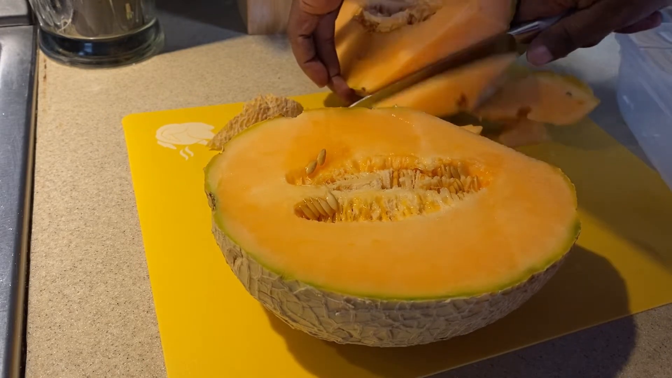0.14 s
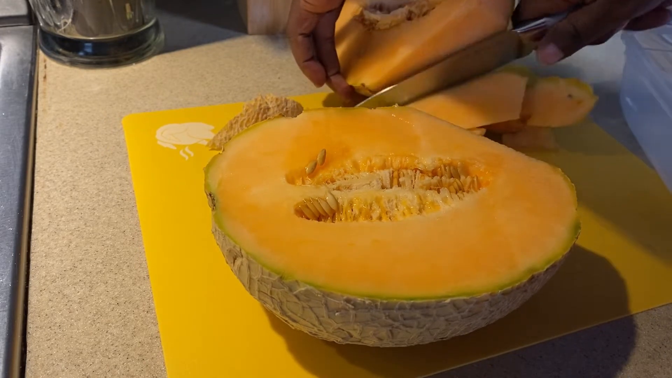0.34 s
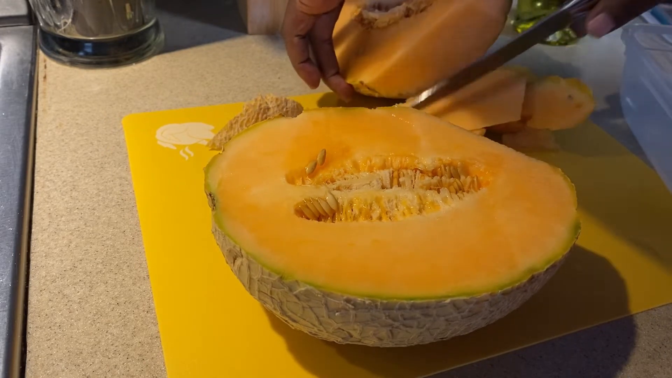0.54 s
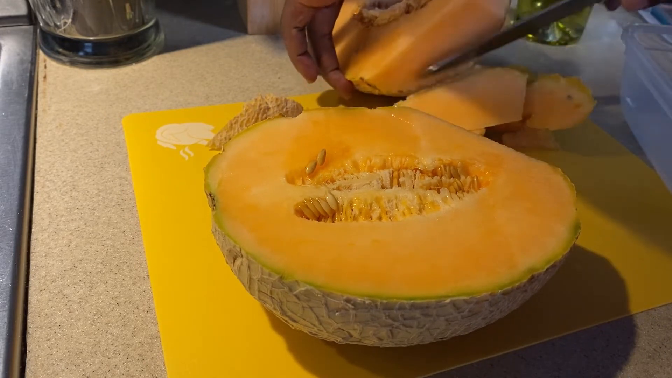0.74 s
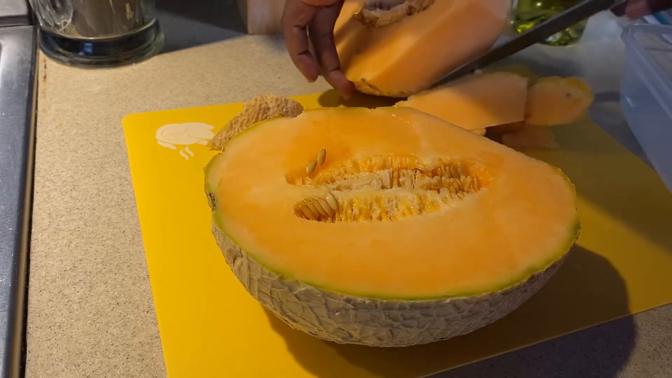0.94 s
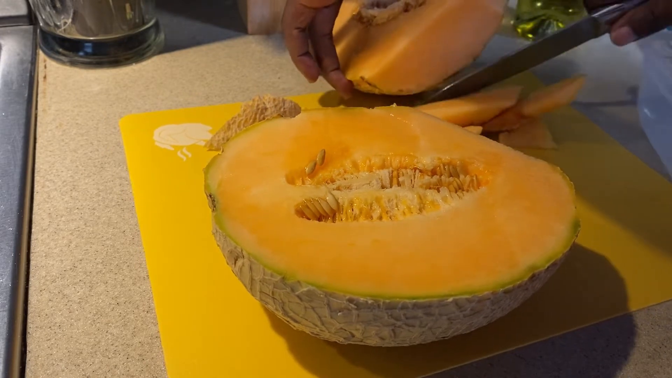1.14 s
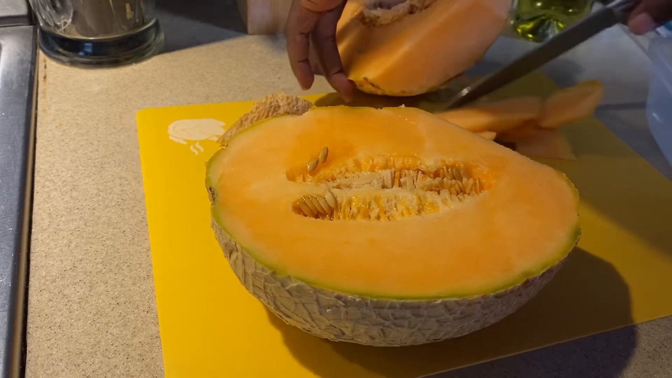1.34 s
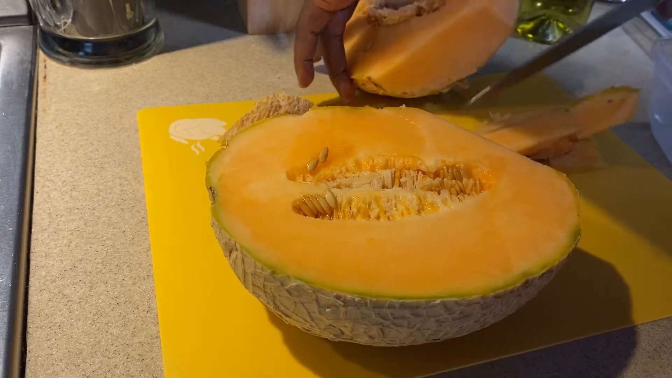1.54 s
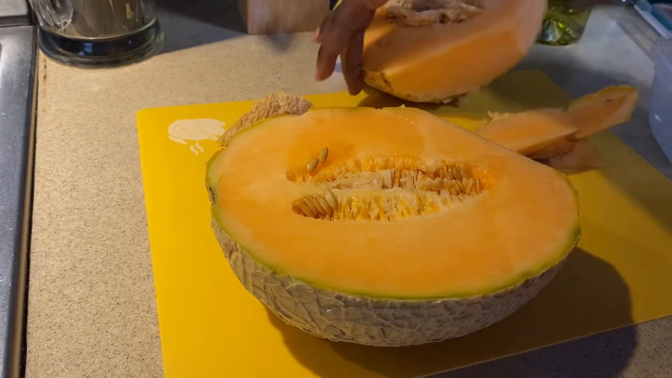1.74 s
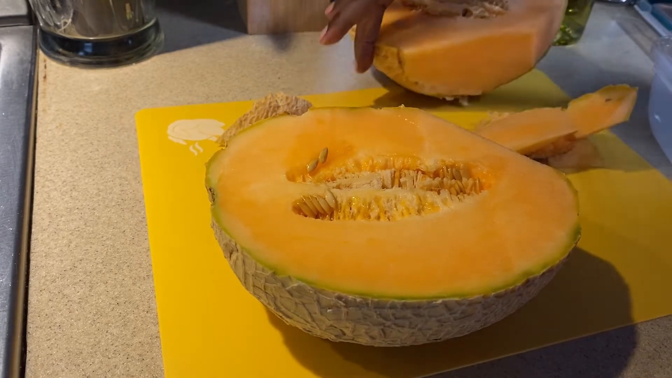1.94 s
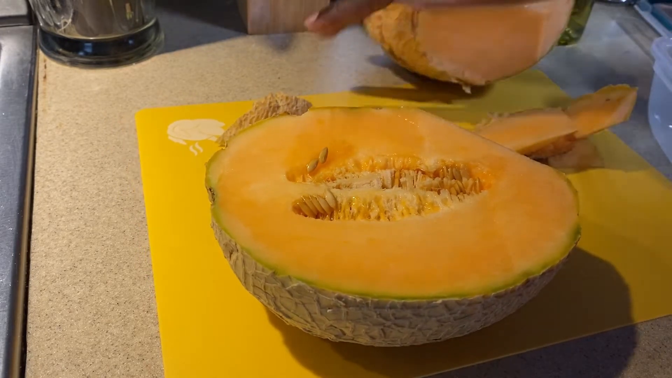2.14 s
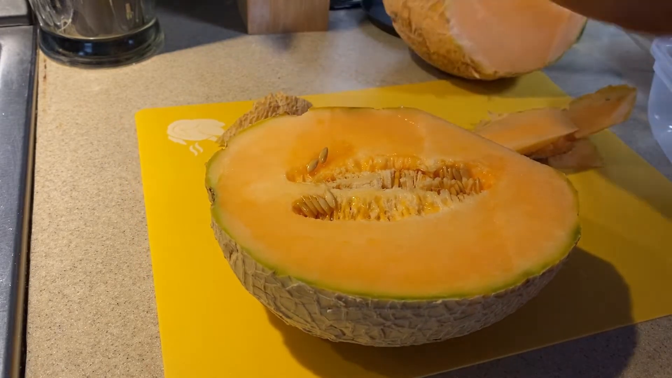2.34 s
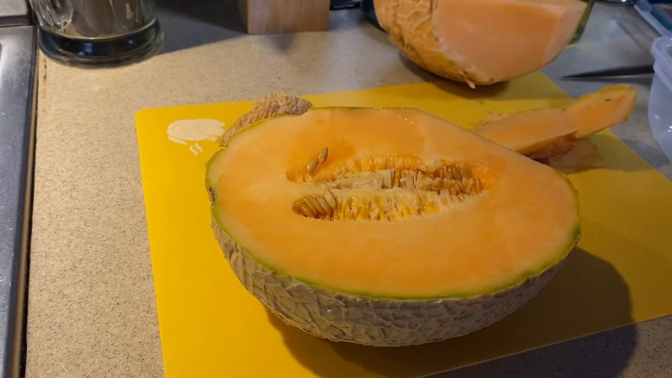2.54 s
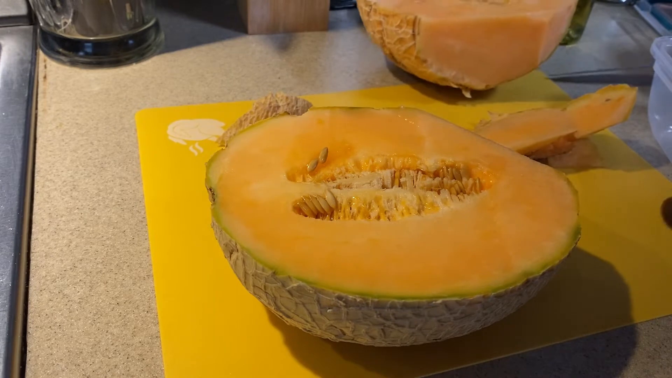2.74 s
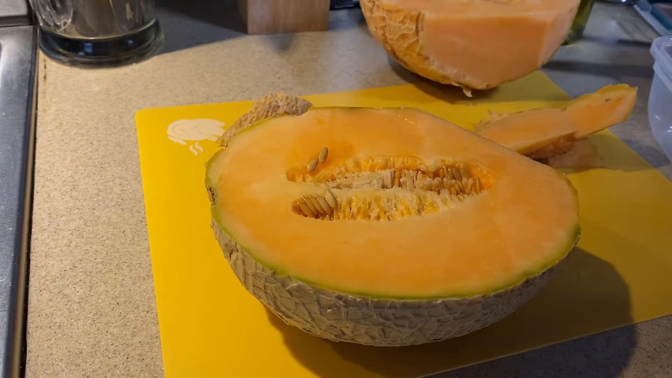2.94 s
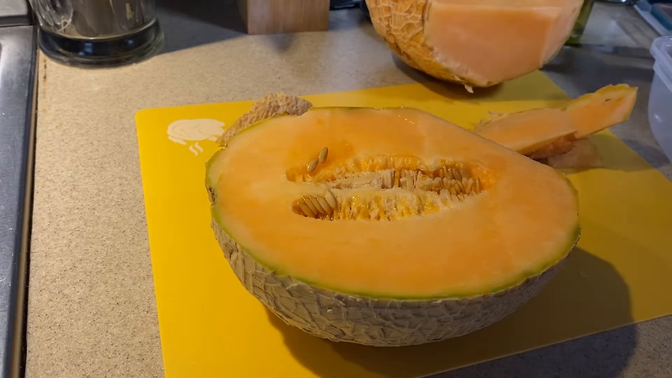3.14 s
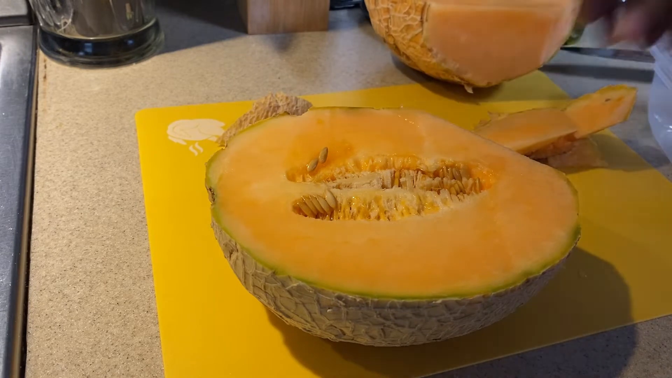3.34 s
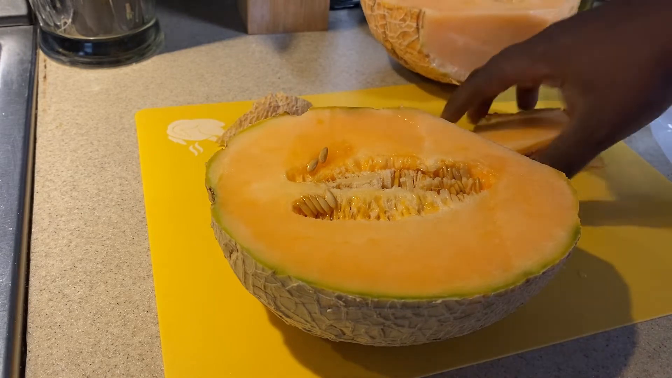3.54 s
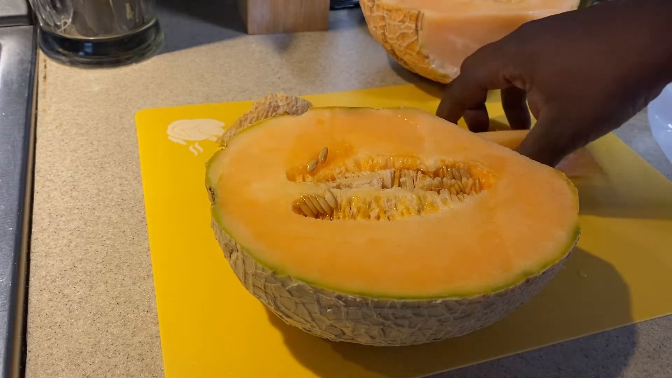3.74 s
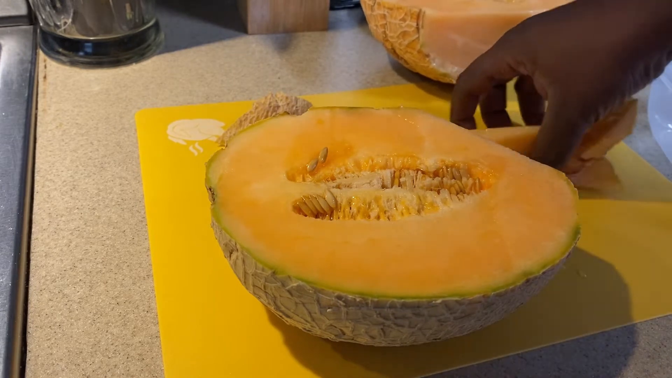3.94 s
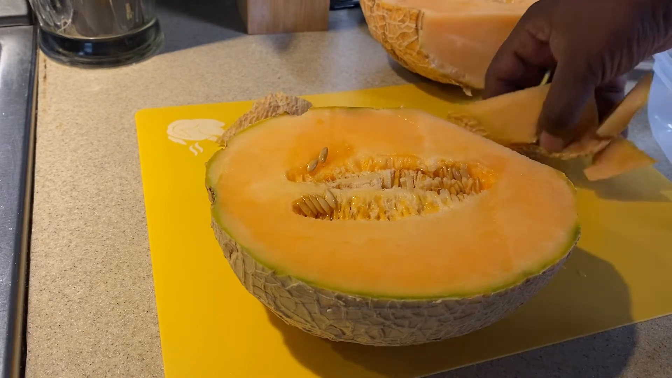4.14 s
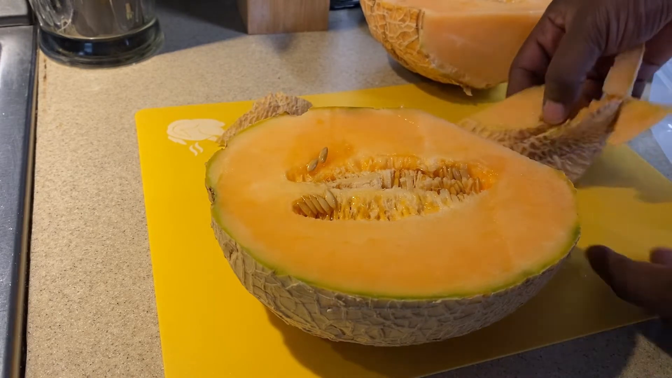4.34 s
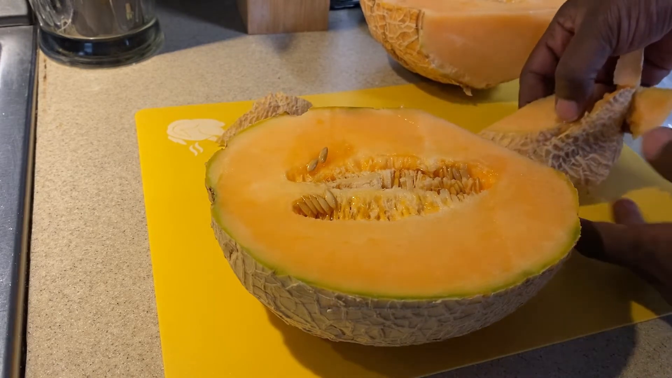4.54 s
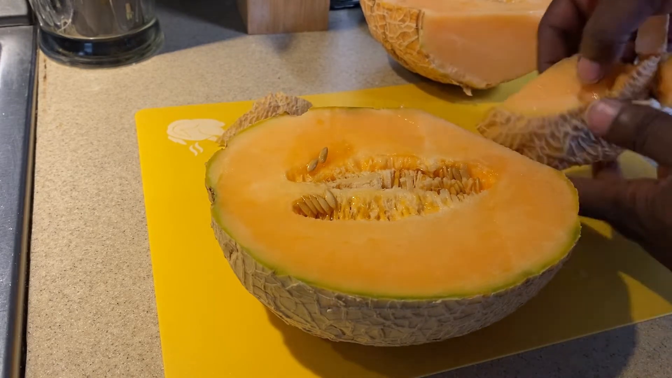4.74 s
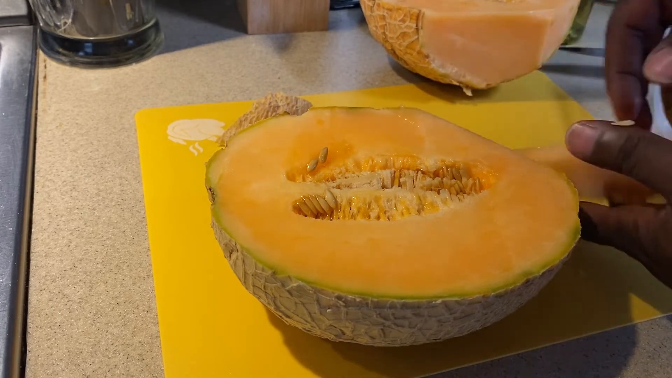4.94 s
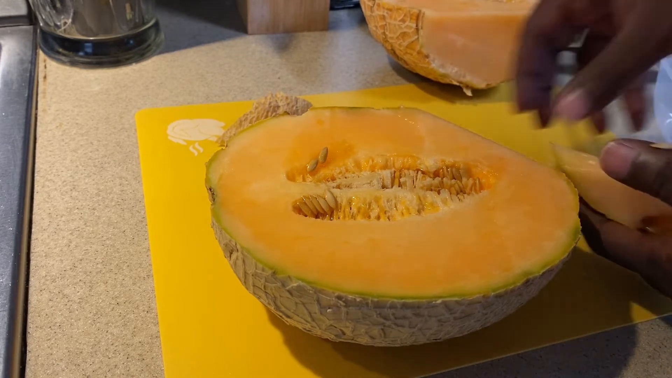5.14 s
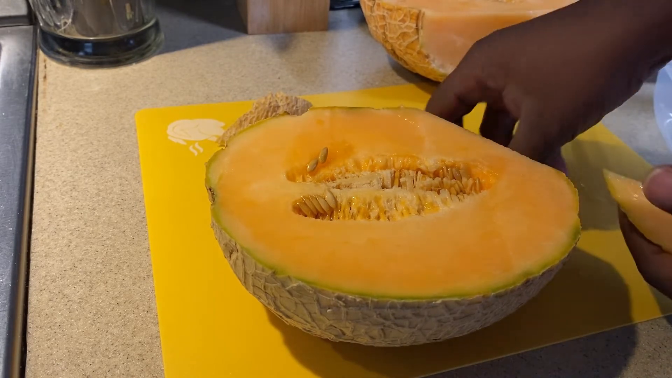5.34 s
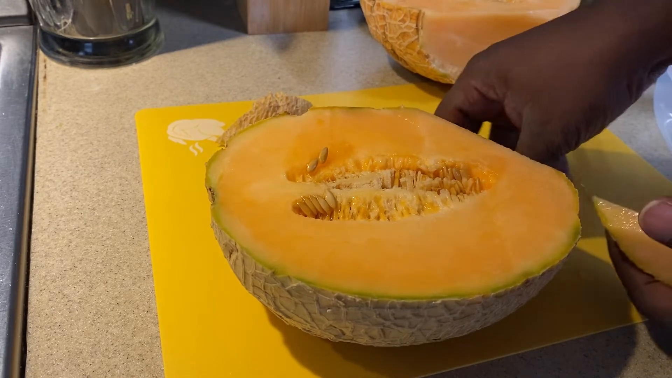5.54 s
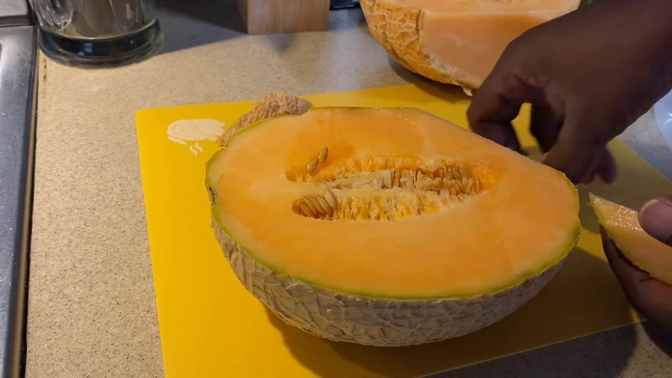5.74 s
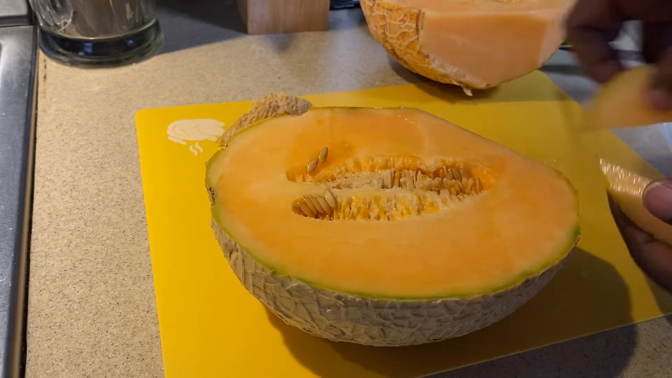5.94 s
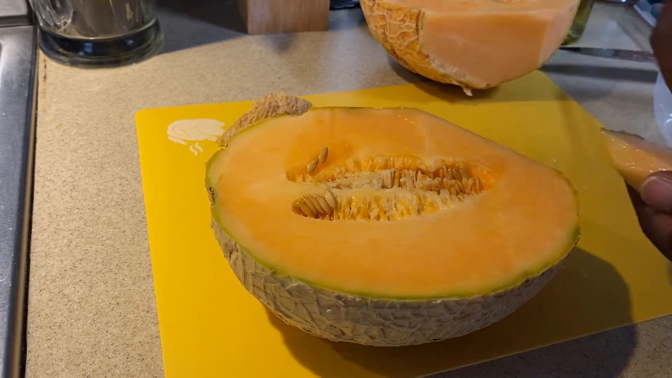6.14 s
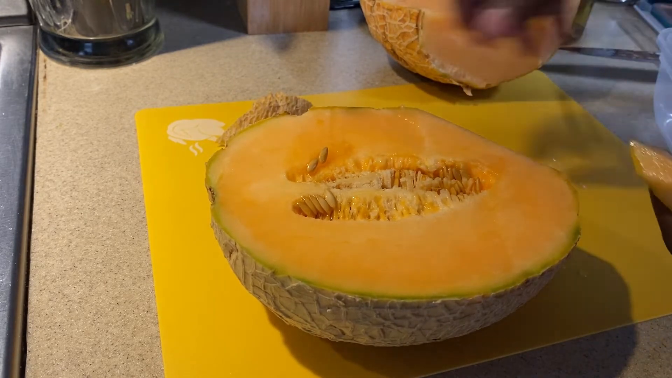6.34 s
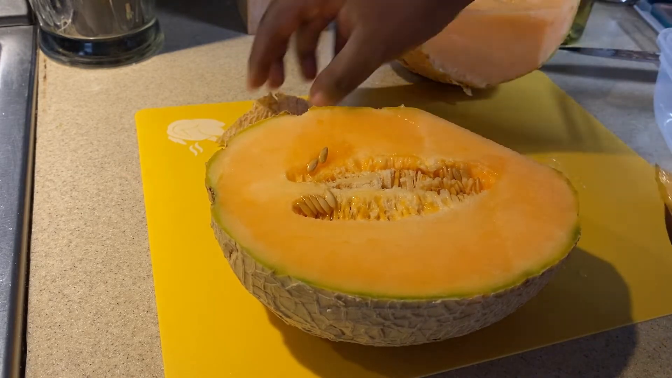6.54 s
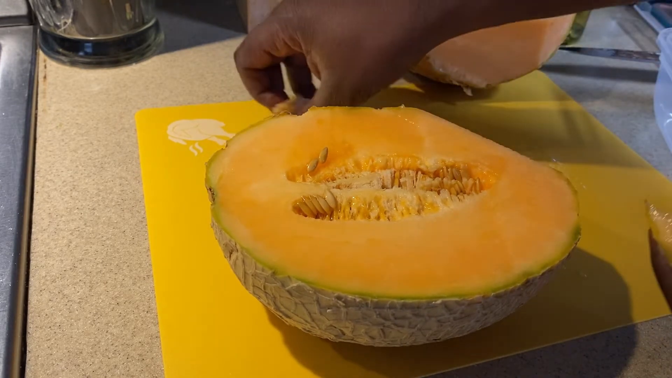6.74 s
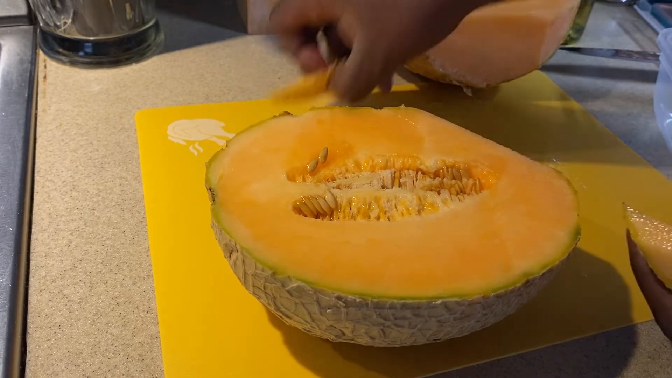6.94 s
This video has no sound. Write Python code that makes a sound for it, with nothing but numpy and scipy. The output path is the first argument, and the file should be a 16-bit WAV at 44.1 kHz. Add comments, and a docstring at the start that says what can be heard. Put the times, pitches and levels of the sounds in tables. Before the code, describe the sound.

In a quiet kitchen, a knife slices the rind off a melon with a dull, juicy rub and knocks through onto a plastic cutting board, loudest about a second in. The knife is then put down: its steel blade rings briefly and the handle rattles to rest. Afterwards fingers gather the wet peel with faint smacks, soft thuds and small squelches. The sound is close, with a little room reverberation.

```python
"""A kitchen knife slices the rind off a melon and knocks through onto a plastic cutting board.
Each impact excites the damped modes of board and counter; friction and juice give bands of noise.
The knife is put down: its steel blade rings in free vibration, then the handle rattles to rest.
Fingers gather the wet peel with small smacks, thuds and squelches. The quiet kitchen reverberates."""
import sys
import numpy as np
from scipy import signal
from scipy.fft import rfft, irfft, next_fast_len
from scipy.io import wavfile
from scipy.ndimage import uniform_filter1d, map_coordinates

SR = 44100
rng = np.random.default_rng(int(sys.argv[2]) if len(sys.argv) > 2 else 0)


def dump(signal):
    """Clip the signal to [-1, 1] and save it as 16-bit WAV at the path in sys.argv[1]."""
    limited = np.clip(np.atleast_2d(signal).T, -1, 1)
    pcm = np.round(limited * 32767).astype(np.int16)
    wavfile.write(sys.argv[1], SR, pcm)


N = 308697

# spectrum of dull rubbing and shuddering on the board: f/Hz, density level/dB
RUB_SPECTRUM = [(40, -38), (90, -4), (300, -1), (650, -10), (900, -10), (1250, -12), (2000, -15.5),
                (3500, -27), (7000, -56.5)]
SIDES = np.array([[1], [-1]])  # opposite signs for left and right
KNOCK_PAN_DB = -2  # left minus right, as for every pan


def amp(db):
    """Amplitude ratio of a level in decibels."""
    return 10 ** (np.asarray(db) / 20)


def unit(x):
    """Normalisation to an rms of 1."""
    return x / np.sqrt(np.mean(x ** 2) + 1e-20)


def peaked(x):
    """Normalisation to a peak of 1."""
    return x / (np.abs(x).max() + 1e-20)


def along(points, hz):
    """Interpolation of (f/Hz, value) points on a logarithmic frequency axis."""
    f, v = np.transpose(points)
    return np.interp(np.log(hz + 1), np.log(f + 1), v)


def octaves(hz, centre_hz):
    """Interval in octaves from a centre frequency."""
    return np.abs(np.log2((hz + 1) / centre_hz))


def seconds(size):
    """Time axis of size samples."""
    return np.arange(size) / SR


def add(track, s, sound, pan_db=0):
    """Superposition of a sound on a stereo track at time s."""
    start = max(round(s * SR), 0)
    part = (sound * amp(SIDES * pan_db / 2))[:, :N - start]
    track[:, start:start + part.shape[1]] += part


def noise(colour_db, size, grain_db=0):
    """Partly coherent stereo noise of rms 1; random amplitude modulation (grain_db) makes it crackle."""
    # likeness of left and right: f/Hz, coherence
    coherence = [(100, 0.91), (300, 0.98), (700, 0.54), (3000, 0.51), (9000, 0.18)]
    m = next_fast_len(size)
    hz = np.fft.rfftfreq(m, 1 / SR)
    grains = amp(grain_db * unit(uniform_filter1d(rng.standard_normal(m), size=24)))
    angle = np.arccos(np.clip(along(coherence, hz), -1, 1)) / 2
    shape = amp(colour_db(hz)) * np.array([np.cos(angle), np.sin(angle)])
    mid, side = irfft(rfft(grains * rng.standard_normal((2, m))) * shape, m)[:, :size]
    return unit(np.array([mid + side, mid - side]))


def ring(modes, size, scatter_db, width):
    """Modal superposition: damped sinusoids of alternating sign, with a side signal near quadrature."""
    t, out = seconds(size), np.zeros((2, size))
    for k, (hz, db, t60) in enumerate(modes):
        decay = (-1) ** k * amp(db + scatter_db * rng.standard_normal() - 60 * t / t60)
        mid = decay * np.sin(2 * np.pi * hz * t)
        side = width * decay * np.cos(2 * np.pi * hz * t + 0.13 * rng.standard_normal())
        out += [mid + side, mid - side]
    return out


def pressure(events, release_db_per_s=220):
    """Envelope of (t/s, duration/s, level/dB) gestures that rise, hold and fade; their powers add."""
    t, power = seconds(N), np.zeros(N)
    for start, length, db in events:
        onset_s = 0.023 + 0.44 * length  # long strokes start gently
        rise_db = 20 * np.maximum(start - t, 0) / onset_s
        fall_db = release_db_per_s * np.maximum(t - start - length, 0)
        heard = rise_db + fall_db < 60
        power[heard] += amp(db - rise_db[heard] - fall_db[heard]) ** 2
    return np.sqrt(power)


def wobble(knots_per_s):
    """Smooth random modulation: a spline through Gaussian values."""
    knots = rng.standard_normal(int(N * knots_per_s / SR) + 4)
    return map_coordinates(knots, [np.arange(N) * knots_per_s / SR])


def patchy(x, depth_db):
    """Brief resonances of juice and air pockets, as random gains over frequency and time."""
    spectra = signal.stft(x, nperseg=512)[2]
    field = uniform_filter1d(rng.standard_normal(spectra.shape[1:]), size=7, axis=0)
    field = unit(uniform_filter1d(field, size=5, axis=1))
    return unit(signal.istft(spectra * amp(depth_db * field), nperseg=512)[1][:, :N])


def strokes():
    """Stick-slip friction modulates a dull rub and the fizz of juice as blade and fingers slide."""
    # strokes on the fruit: t/s, duration/s, rub level/dB, hiss level/dB
    gestures = [(0, 0.0099, -60.5, -69.5), (0.094, 0.083, -57, -61.5), (1.063, 0.14, -47, -63),
                (1.076, 0.019, -36, -53.5), (1.23, 0.22, -58, -55), (1.346, 0.054, -51.5, -52.5),
                (1.699, 0.033, -64, -67.5), (2.315, 0.25, -60.5, -68.5), (3.622, 0.081, -54, -57),
                (3.76, 0.17, -64, -62.5), (3.94, 0.38, -67, -65.5), (4.169, 0.058, -62.5, -61),
                (4.345, 0.18, -67.5, -55), (4.575, 0.022, -51.5, -56), (4.851, 0.069, -60.5, -71.5),
                (5.022, 0.42, -96.5, -73), (6.618, 0.16, -66, -63.5), (6.947, 0.042, -62, -65.5)]
    # spectrum of fizzing juice: f/Hz, density level/dB
    juice = [(400, -22.5), (1000, -15.5), (2300, -1.5), (4800, -0.5), (7500, -6.5), (11500, -10.5),
             (16000, -18.5)]
    start, length, rub_db, wet_db = np.transpose(gestures)
    rub = patchy(noise(lambda hz: along(RUB_SPECTRUM, hz), N, grain_db=2.0), depth_db=2.5)
    wet = patchy(noise(lambda hz: along(juice, hz), N, grain_db=3.5), depth_db=1.8)
    rub *= pressure(zip(start, length, rub_db)) * amp(-.6 * SIDES)
    wet *= pressure(zip(start, length, wet_db)) * amp(.7 * SIDES)
    stick_slip = amp(1.3 * wobble(knots_per_s=45))
    return stick_slip * (rub + wet)


def pats():
    """A soft impact excites only low, heavily damped modes: fruit and hand thud."""
    # soft bumps: t/s, peak level/dB, f/Hz
    bumps = [(.002, -46, 148), (0.093, -38, 176), (0.175, -29.5, 170.5), (1.088, -23, 205),
             (1.152, -24, 190), (1.712, -56, 176), (2.33, -41.5, 71), (3.077, -29, 142.7),
             (3.554, -40.5, 91.3), (4.662, -51, 175), (6.588, -45, 199)]
    out, t = np.zeros((2, N)), seconds(SR // 2)
    for s, db, hz in bumps:
        thud = ring([(hz, 0, .11), (1.8 * hz, -9, .07)], len(t), scatter_db=1, width=.1)
        add(out, s, amp(db) * peaked(thud * (1 - np.exp(-t / 0.0049))), pan_db=-1.5)
    return out


def smacks():
    """Sudden release of tension: fibres snap and wet peel lets go in crackling noise bursts."""
    # snaps and smacks: t/s, peak level/dB, spectral peak f/Hz, T60/s
    snaps = [(.086, -42.5, 11900, .02), (.112, -31, 10100, 0.0093), (0.136, -32, 4020, 0.014),
             (.151, -49, 13000, 0.019), (0.204, -44, 4660, 0.022), (1.697, -34.5, 4660, 0.019),
             (3.552, -32.5, 4600, 0.027), (3.613, -46, 2510, 0.032), (3.655, -31, 4440, 0.13),
             (4.318, -40, 6940, 0.03), (4.84, -47, 6330, 0.027), (6.585, -28, 4480, 0.026),
             (6.628, -32.5, 4560, 0.037), (6.986, -36, 1390, 0.052)]
    out, t = np.zeros((2, N)), seconds(SR // 5)
    for s, db, bright_hz, t60 in snaps:
        burst = noise(lambda hz: -13 * np.sqrt(octaves(hz, bright_hz)), len(t), grain_db=1.5)
        envelope = (1 - np.exp(-t / (0.045 * t60))) * amp(-60 * t / t60)
        add(out, s, amp(db) * peaked(burst * envelope), pan_db=1.5)
    return out


def knock(pitch_hz, settle_s, focus_db, clatter_db):
    """Selective excitation: the struck spot favours modes near one pitch; the load detunes them."""
    # modes of the board: f/Hz, level/dB, T60/s
    board_modes = [(290, 0, 0.16), (355, 3, 0.11), (417, 1.5, 0.059), (547, 2, 0.14), (619.8, 2.5, 0.15),
                   (652, 0, .05), (805, -3.5, 0.22), (890, -15.5, 0.016), (1107, 0.5, 0.17),
                   (1240, -1.5, 0.057), (1310, -1, 0.037), (1290, -7.5, 0.028), (1490, -7.5, 0.26),
                   (2450, -15, 0.027)]
    # stereo width of the board's radiation: f/Hz, side-to-mid ratio
    width = [(100, .07), (290, 0.39), (600, 1), (1400, 1)]
    # spectrum of the clatter: f/Hz, density level/dB
    colour = [(90, -24.0), (200, -6.5), (700, -0.5), (1400, -7.5), (2200, -16.5), (5000, -42.5)]
    t, modes = seconds(SR // 3), []
    for hz, db, t60 in board_modes:
        detuned_hz = hz * (1 + .007 * rng.standard_normal())
        modes.append((detuned_hz, db - focus_db * np.tanh(octaves(hz, pitch_hz) / .6), t60))
    body = ring(modes, len(t), scatter_db=1, width=along(width, pitch_hz))
    # the patch under the blade sinks in pitch as the load spreads
    strike_hz, patch_db, patch_t60 = 1600, 6, .042 + 4 * settle_s
    sinking_hz = pitch_hz + (strike_hz - pitch_hz) * np.exp(-t / settle_s)
    phase = 2 * np.pi * np.cumsum(sinking_hz) / SR
    patch = np.sin(phase) + SIDES * along(width, sinking_hz) * np.cos(phase)
    patch *= amp(patch_db - 60 * t / patch_t60)
    tone = peaked((body - patch) * (1 - np.exp(-t / .0009)))
    clatter = noise(lambda hz: along(colour, hz), len(t))
    return tone + clatter * amp(clatter_db - 60 * t / .06) * (1 - np.exp(-t / .0015))


def thump():
    """The counter's large mass gives it low natural frequencies and a slow response."""
    # modes of the counter: f/Hz, level/dB, T60/s
    modes = [(79, -10, 0.21), (99, -14, 0.39), (125, -6.5, 0.2), (188, 1, 0.046), (212, -2, 0.061)]
    t = seconds(SR // 3)
    return peaked(ring(modes, len(t), scatter_db=2.0, width=0.069) * (1 - np.exp(-t / 0.0032)))


def blows():
    """Impact excitation: a contact crack, the board's knock, the counter's thump and a dull shudder."""
    # blows on the board: t/s, level/dB, crack offset/dB, favoured f/Hz, pitch settling time/s
    impacts = [(.093, -33.5, -17, 714, 0.0013), (0.136, -37.5, -21, 327, 0.0021),
               (0.157, -23, -23, 539, 0.0063), (.259, -29.5, -21.5, 460, 0.0031),
               (0.317, -39.5, -19, 310, .003), (0.754, -58.5, -10.5, 960, 0.0022),
               (0.99, -32, -13.5, 552.8, 0.0026), (1.079, -8.5, -12.5, 288, 0.0017),
               (1.116, -20, -36, 290, 0.00081), (1.1455, -5.5, -7.5, 669, .001),
               (1.146, -10, -30, 1369, 0.0022), (1.18, -25, -24, 1290, 0.0012),
               (2.398, -42.5, -23, 534, 0.0021), (2.511, -16, 0.5, 1150, 0.0022),
               (2.54, -22, -0.5, 1220, 0.0012), (2.615, -34, -22, 430, 0.0015),
               (2.826, -50, -10.5, 403, 0.0017), (2.963, -17, -13, 402.7, 0.0017),
               (3.015, -22.5, -12, 382, 0.00172), (3.039, -17.5, -6.5, 424, 0.0022),
               (3.134, -19.5, -12.5, 394, 0.0021), (3.212, -22, -14.5, 357, 0.00186),
               (3.784, -45.5, -22, 870, 0.0026), (4.567, -52, -26, 350, 0.0023),
               (4.607, -45, -29, 350, 0.0023), (4.852, -34.5, -38, 590, .002), (4.905, -43, -9, 805, 0.003),
               (6.587, -46, 5, 661, 0.0011), (6.637, -43.5, 4.5, 617, 0.0011)]
    # spectrum of hard contact: f/Hz, density level/dB
    contact = [(300, -18.5), (1200, -2), (2500, 2.5), (4000, -1), (7000, -4.5), (11000, -10.5),
               (16000, -13.5)]
    out, t = np.zeros((2, N)), seconds(SR // 2)
    shudder_envelope = (1 - np.exp(-t / 0.006)) * amp(-28.5 - 60 * t / 0.49)
    for s, db, crack_db, pitch_hz, settle_s in impacts:
        snap = noise(lambda hz: along(contact, hz), len(t))
        dull_tail = noise(lambda hz: along(contact, hz) - 6 * hz / 10000, len(t))
        crack = snap * amp(-60 * t / 0.011) + dull_tail * amp(-12.5 - 60 * t / 0.079)
        add(out, s, amp(db + crack_db + 6.0) * crack * (1 - np.exp(-t / 0.001)))
        board = knock(pitch_hz, settle_s, focus_db=13.0, clatter_db=-7.5)
        add(out, s + 0.00042, amp(db) * board, KNOCK_PAN_DB)
        add(out, s, amp(-30.5 + 0.52 * db) * thump())  # grows more slowly than the blow
        shudder = noise(lambda hz: along(RUB_SPECTRUM, hz) - 8 * np.tanh(octaves(hz, pitch_hz) / 0.25),
                        len(t), grain_db=0.5)
        add(out, s, amp(db) * shudder_envelope * shudder)
    return out


def drag():
    """Sliding friction of wet melon on plastic gives a soft, hollow swish."""
    # slides: t/s, duration/s, level/dB
    slides = [(.325, 0.0062, -60), (2.21, 0.15, -61.5)]
    # spectrum of the swish: f/Hz, density level/dB
    colour = [(500, -11), (1500, -11.5), (2350, 3.5), (3200, -9.5), (7000, -12.5), (16000, -31)]
    return pressure(slides) * noise(lambda hz: along(colour, hz), N, grain_db=1.0)


def steel(t, tilt_db):
    """Free vibration of the blade: its modes decay in two stages, many beat, and one swells late."""
    # modes of the blade: f/Hz, level/dB, T60/s, beat f/Hz, beat depth (negative swells first), pan/dB
    modes = [(1098, -36.5, .85, 6, .15, -2), (1276, -44, 1, 0, 0, 0), (2188, -37.5, .76, 0, 0, 5),
             (2740, -30, .32, 5.5, -.55, 6), (3349, -30, .33, 5.5, .4, -1), (3941, -51, .33, 0, 0, 0),
             (4258, -37, .28, 0, 0, 0), (4324, -45, .4, 0, 0, 0), (4631, -44, .5, 11, .7, 2),
             (4904, -35, .28, 0, 0, 0), (6036, -33.5, .31, 10, .55, -3), (6288, -48, .3, 0, 0, 0),
             (7615, -49, .27, 0, 0, 0), (7856, -35.5, .23, 19, .3, 0), (9789, -37, .28, 11.5, .8, 0),
             (10040, -44, .27, 0, 0, 0), (10792, -47, .28, 0, 0, 0), (11090, -51, .28, 0, 0, 0),
             (11572, -50, .27, 0, 0, 0), (11905, -43, .23, 17, .4, 0), (14321, -42, .22, 25, .3, 0)]
    swell_hz, swell_db, swell_peak_s = 4631, -41.5, .092
    out = np.zeros((2, len(t)))
    for hz, db, t60, beat_hz, depth, pan_db in modes:
        octave = np.log2(hz / 2200)
        flash = amp(-6.5 + 5.6 * octave - 60 * t / 0.11)
        beating = 1 + depth * np.cos(2 * np.pi * beat_hz * t)
        envelope = amp(db) * (flash + amp(-60 * t / t60)) * beating
        if hz == swell_hz:
            envelope += amp(swell_db) * (t / swell_peak_s * np.exp(1 - t / swell_peak_s)) ** 9
        phase = rng.uniform(0, 2 * np.pi) + SIDES * (0.68 + 0.058 * octave)
        out += amp(tilt_db * octave + SIDES * pan_db / 2) * envelope * np.sin(2 * np.pi * hz * t + phase)
    return out


def clinks():
    """Contact damping: the blade rings freely after each touch until a resting contact stills it."""
    # touches: t/s, level/dB, tilt/(dB per octave), rise time/s, free ringing time/s
    touches = [(0.437, -29.5, -3.5, 0.012, 0.04), (0.748, -45.5, 3, 0.0035, 0.0077),
               (2.512, -1, 0, 0.00024, 0.456)]
    stilled_t60 = .17
    out, t = np.zeros((2, N)), seconds(SR * 2 // 3)
    for s, db, tilt_db, rise_s, free_s in touches:
        damping = amp(-60 * np.maximum(t - free_s, 0) / stilled_t60)
        add(out, s, amp(db) * steel(t, tilt_db) * damping * (1 - np.exp(-t / rise_s)))
    return out


def scrape():
    """Friction of the edge grazing the rind gives a thin, bright rasp that stops quickly."""
    # grazes: t/s, duration/s, level/dB
    grazes = [(.445, .04, -63), (.75, .035, -69.5), (.94, .06, -63.5), (1.06, .02, -49.5), (1.82, .08, -75)]
    # spectrum of the rasp: f/Hz, density level/dB
    colour = [(800, -11), (1200, -4.5), (2000, -10.5), (4300, -2), (7000, -2.5), (11000, -0.5), (16000, 0)]
    rasp = noise(lambda hz: along(colour, hz), N, grain_db=4.5)
    return pressure(grazes, release_db_per_s=331.5) * rasp


def taps():
    """Brief contact gives a broad spectrum: the settling steel ticks on the board and rings thinly."""
    # taps of steel: t/s, tick level/dB, ring level/dB
    contacts = [(2.965, -39, -69), (2.97, -40, -71), (3.015, -44, -67), (3.042, -37, -49.5),
                (3.053, -26, -49), (3.135, -45, -70), (3.144, -26, -62), (3.155, -36, -77),
                (3.211, -28, -58), (3.219, -40, -64)]
    # high modes left to the blade as it lies on the board: f/Hz, level/dB, T60/s
    modes = [(7273, -9, .14), (7607, -14, .2), (8215, -7, .14), (11000, -11, .1), (11580, -5, .11),
             (11910, 0, .14), (12210, -6, .12), (14150, -5, .2)]
    # spectrum of a tick: f/Hz, density level/dB
    colour = [(1000, 23), (4000, 6), (11000, -9.5), (16000, -1.5)]
    out, t = np.zeros((2, N)), seconds(SR // 4)
    for s, tick_db, ring_db in contacts:
        tick = noise(lambda hz: along(colour, hz), len(t))
        add(out, s, amp(tick_db - 60 * t / .009) * tick)
        add(out, s, amp(ring_db) * ring(modes, len(t), scatter_db=5, width=1.0))
    return out


def rattle():
    """Repeated impacts: the knife rocks to rest, and each contact ticks and excites board and counter."""
    # uneven contacts of the handle: t/s, relative level/dB
    contacts = [(3.053, 5.5), (3.061, -7), (3.079, -2), (3.094, 1), (3.104, -3.5), (3.142, -1),
                (3.155, 1.5), (3.165, -0.5), (3.178, -1.5), (3.191, -2), (3.202, -11), (3.218, 3.5),
                (3.231, -1.5)]
    # spectrum of a tick: f/Hz, density level/dB
    colour = [(300, -26.5), (900, 5.0), (2200, 8.0), (3700, 3.0), (6000, -10.0), (16000, -39.0)]
    out, t = np.zeros((2, N)), seconds(SR // 16)
    for s, db in contacts:
        tick = noise(lambda hz: along(colour, hz), len(t))
        add(out, s, amp(db - 34 - 60 * t / 0.054) * tick)
        board = knock(pitch_hz=396, settle_s=.001, focus_db=17.0, clatter_db=-4.0)
        add(out, s, amp(db - 28) * board, KNOCK_PAN_DB)
        add(out, s, amp(db - 34.5) * thump())
    return out


def sweeps():
    """Light friction between hand and peel gives a faint, broad band of noise."""
    # brushing movements: t/s, duration/s, level/dB, spectral peak f/Hz
    brushes = [(3.772, 0.015, -54, 1010), (3.88, .04, -61, 1200), (4.2, 0.041, -56.5, 1612),
               (6.215, 0.079, -77.5, 5790), (6.351, 0.066, -71.5, 2724)]
    out = np.zeros((2, N))
    for s, length, db, bright_hz in brushes:
        swish = noise(lambda hz: -11 * octaves(hz, bright_hz) ** 0.84, N)
        out += pressure([(s, length, db)]) * swish
    return out


def bursts(pitch_hz, size):
    """Cavity resonance: tiny bursts of juice ring near a pitch that rises as their pocket shrinks."""
    bursts_per_s, decay_cycles, scatter_db, scatter_octaves, glide_per_s = 800, 7, 4, .045, .9
    count, t = int(bursts_per_s * size / SR), seconds(SR // 100)
    out = np.zeros((2, size + len(t)))
    starts = rng.uniform(0, size, count).astype(int)
    phases = rng.uniform(-1.26, 1, count)
    detunings, strengths = rng.standard_normal((2, count))
    for start, phase, detuning, strength in zip(starts, phases, detunings, strengths):
        hz = pitch_hz * 2 ** (scatter_octaves * detuning) * (1 + glide_per_s * start / SR)
        decay = amp(scatter_db * np.tanh(strength)) * np.exp(-hz * t / decay_cycles)
        out[:, start:start + len(t)] += decay * np.sin(2 * np.pi * hz * t + SIDES * phase)
    return unit(out[:, :size])


def squelch():
    """Forced flow: juice pinched out of the peel hisses and excites two pocket resonances."""
    # pinches: t/s, duration/s, level/dB, lower f/Hz, upper f/Hz, upper relative level/dB
    pinches = [(5.3067, 0.0063, -38.5, 3260, 4140, -1.5), (5.317, 0.032, -49.5, 3025, 3900, -2),
               (5.35, 0.023, -50, 3200, 5500, -2), (5.387, 0.038, -53, 4050, 6610, -8),
               (5.469, 0.071, -59, 3300, 4190, -4), (5.503, 0.028, -53.5, 3240, 4070, -5.5),
               (5.528, 0.028, -53.5, 3620, 5400, 1), (5.568, 0.041, -57.5, 2760, 4700, -6)]
    # spectrum of the hiss: f/Hz, density level/dB
    colour = [(300, -6), (1000, -13), (1700, -4.5), (2300, -6), (3000, -2.5), (4400, -9), (5300, -11),
              (7000, -10.5), (9000, -19), (16000, -15)]
    out, t = np.zeros((2, N)), seconds(SR // 10)
    for s, length, db, lower_hz, upper_hz, upper_db in pinches:
        hiss = amp(-2) * noise(lambda hz: along(colour, hz), len(t), grain_db=2)
        wet = unit(hiss + bursts(lower_hz, len(t)) + amp(upper_db) * bursts(upper_hz, len(t)))
        attack = np.minimum(t / (.002 + .2 * length), 1)
        fall_db = 20 * np.maximum(t - length, 0) / (.003 + .6 * length)
        add(out, s, amp(db - fall_db) * attack * wet, pan_db=2.0)
    return out


def kitchen(x):
    """Reverberation: reflections from cupboards and walls decay at a rate that depends on frequency."""
    # reverberation time: f/Hz, T60/s
    decay_times = [(100, 0.46), (300, 0.3), (1000, .4), (4000, .42), (12000, 0.35)]
    hz, t, spectra = signal.stft(rng.standard_normal((2, SR * 2 // 3)), SR, nperseg=256)
    decay = amp(-60 * t / along(decay_times, hz)[:, None])
    tail = signal.istft(spectra * decay, SR, nperseg=256)[1]
    # long waves reach both sides more alike
    lowpass = signal.butter(2, 300, fs=SR, output="sos")
    tail[1] += signal.sosfilt(lowpass, tail[0] - tail[1])
    tail *= 1 - np.exp(-seconds(tail.shape[1]) / .012)  # builds up as the sound reaches the walls
    return signal.fftconvolve(x.mean(axis=0)[None], tail / np.linalg.norm(tail[0]), axes=1)[:, :N]


def scene():
    """Superposition of direct sound, reverberation and a low, steady background."""
    # spectrum of the kitchen's background: f/Hz, density level/dB
    room_tone = [(24, -33.5), (48, -2), (85, -13), (130, -16), (290, -24), (500, -34), (1200, -44),
                 (2500, -43.5), (4000, -50), (16000, -52)]
    direct = blows() + pats() + rattle() + taps() + smacks() + strokes()
    direct += drag() + scrape() + squelch() + sweeps() + clinks()
    background = amp(-65.5) * noise(lambda hz: along(room_tone, hz), N)
    return direct + amp(-9.5) * kitchen(direct) + background


def record(dry):
    """Linear filtering: each microphone port colours its side, and a band limit cuts the top treble."""
    # difference between the ports: f/Hz, left minus right level/dB
    port_balance = [(120, 0.5), (480, -1.5), (680, -3), (1100, 0.5), (1500, 0), (2200, 2.5), (5000, 0)]
    top_hz, edge_hz = 16200, 700
    m = next_fast_len(N + SR // 4)
    hz = np.fft.rfftfreq(m, 1 / SR)
    ports = amp(SIDES * along(port_balance, hz) / 2)
    band_limit = np.clip((top_hz - hz) / edge_hz + .5, 0, 1)
    return irfft(rfft(dry, m) * ports * band_limit, m)[:, :N]


dry = scene()
out = record(dry)
dump(out)
```